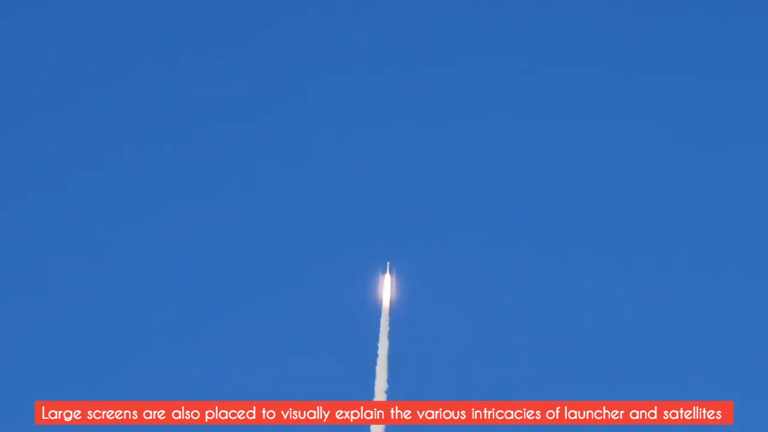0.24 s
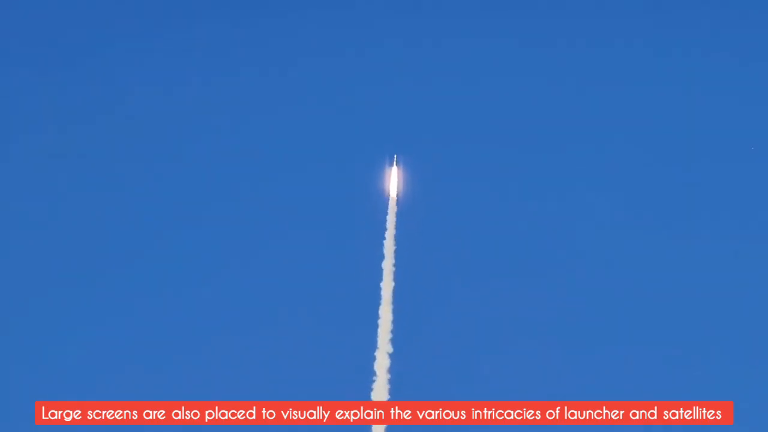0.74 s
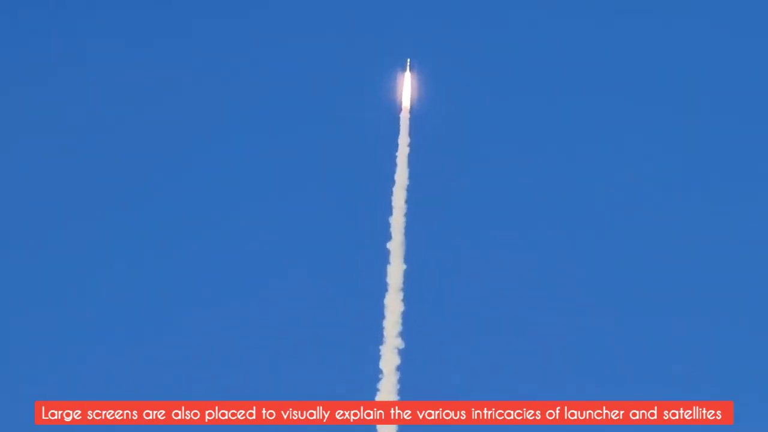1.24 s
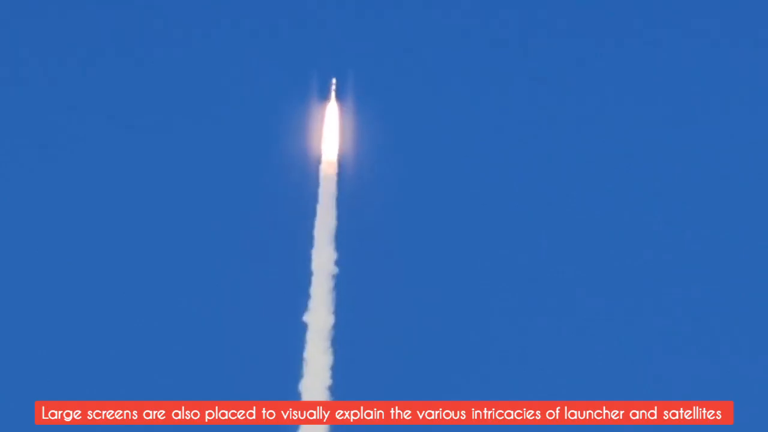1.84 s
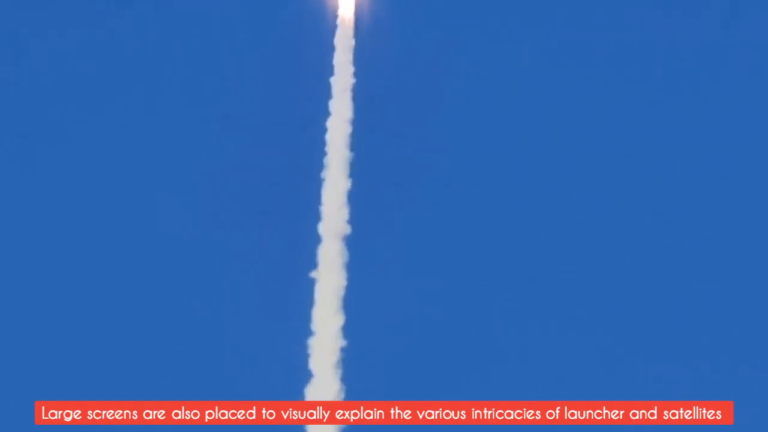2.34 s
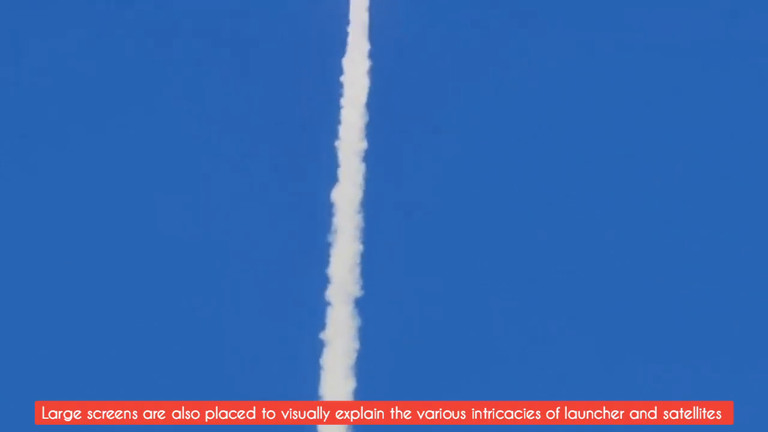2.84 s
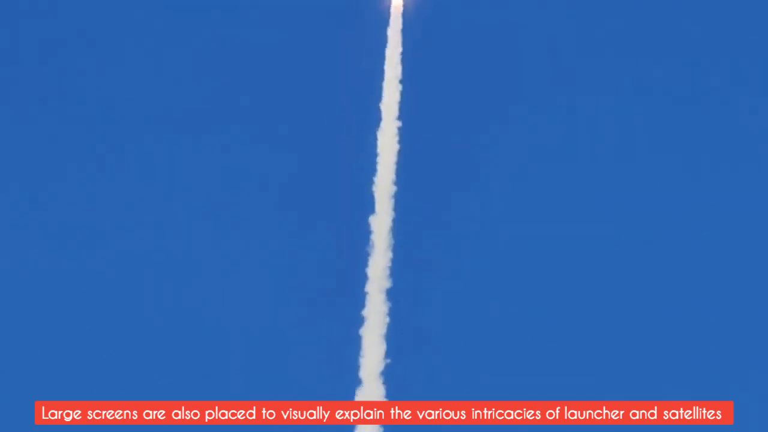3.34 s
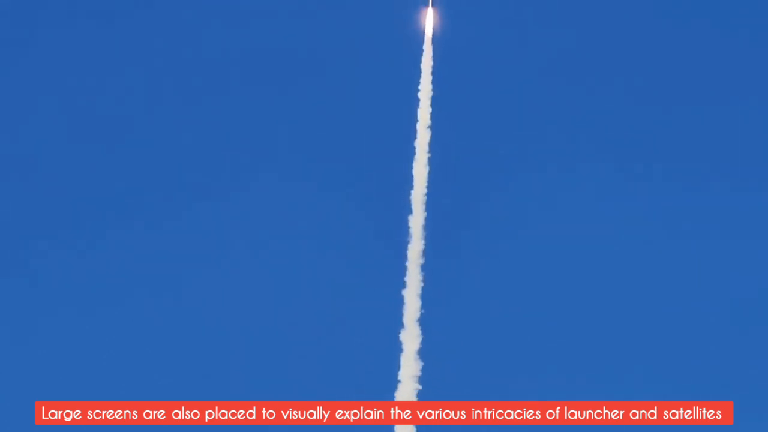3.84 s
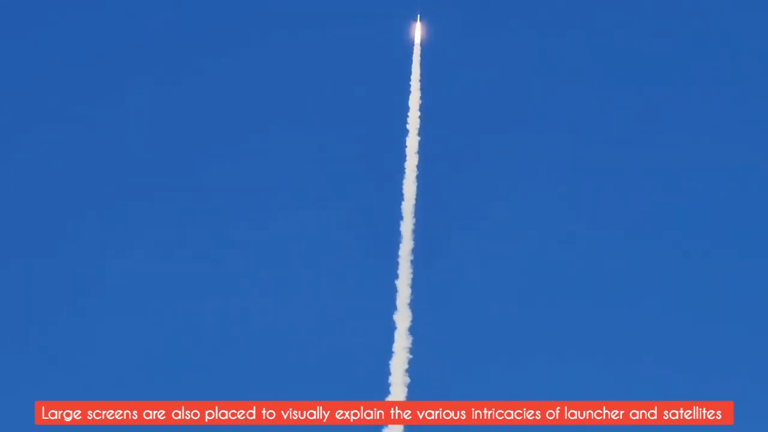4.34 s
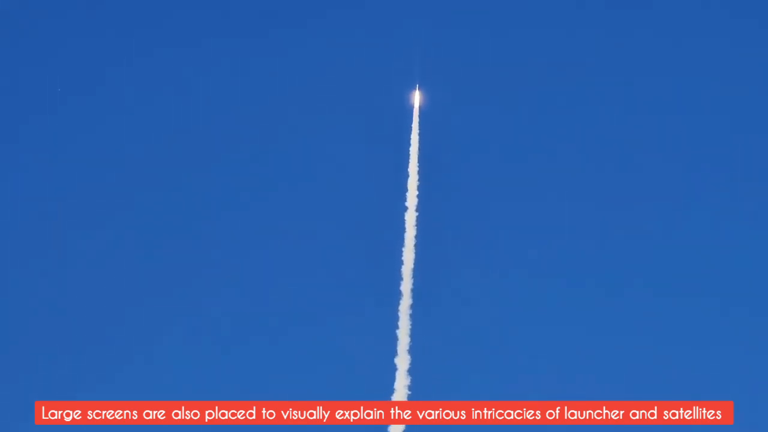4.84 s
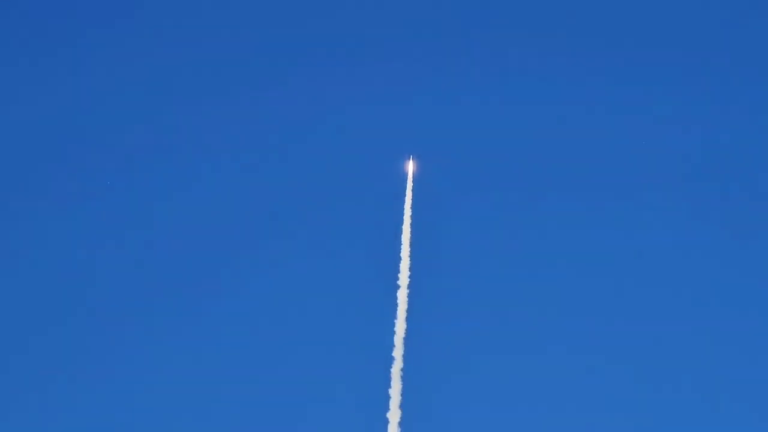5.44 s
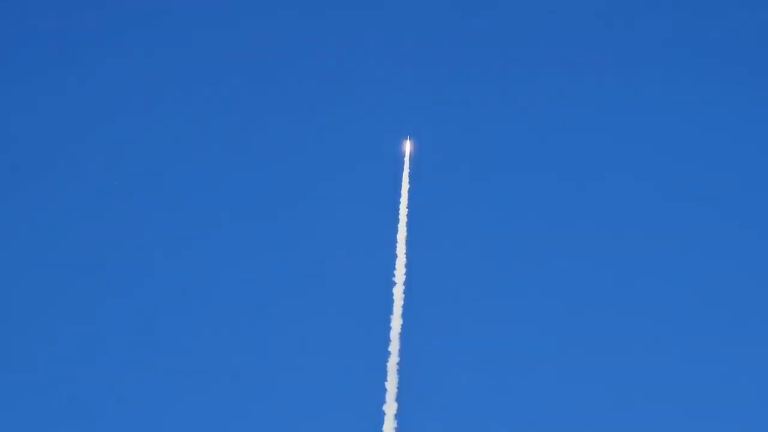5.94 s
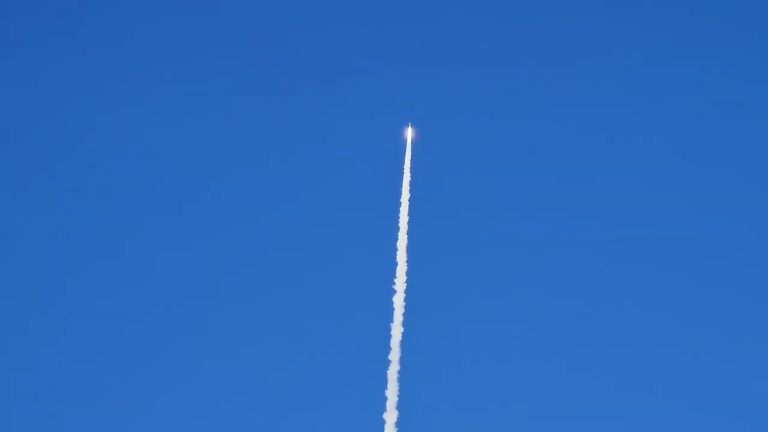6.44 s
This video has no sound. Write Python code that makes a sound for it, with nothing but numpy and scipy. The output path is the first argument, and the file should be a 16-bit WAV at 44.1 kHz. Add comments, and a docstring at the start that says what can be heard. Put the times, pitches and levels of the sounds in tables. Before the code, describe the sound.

A handheld microphone in open air picks up distant rocket exhaust, all bass roll and muffled buffeting, over very faint air noise. Small handling scuffs appear early. Then the sound blinks out for an instant and a rushing, shivering hiss joins, quickly brightening, turning briefly hollow, and tapering away over several seconds. Dull knocks, the heaviest past the middle, punctuate the steady rumble.

```python
"""A far-off rocket rumbles and rolls in the open air, with a few dull thumps and faint camera handling.
After a brief dropout a fluttering hiss cuts in, swells, brightens and slowly fades, with sharp ticks.
The exhaust is three bands of levelled noise; thumps are rounded push-pull pressure fronts.
The hiss is noise in 22 bands, each rising and falling by its own law; clicks are dying noise scuffs."""
import sys
import numpy as np
from scipy import signal
from scipy.fft import rfft, irfft, next_fast_len
from scipy.io import wavfile
from scipy.ndimage import uniform_filter1d, minimum_filter1d

SR = 44100
rng = np.random.default_rng(int(sys.argv[2]) if len(sys.argv) > 2 else 0)


def generate_wav(sig):
    """Save sig (samples, or channels by samples) to the path in sys.argv[1] as 16-bit PCM at SR."""
    pcm = np.round(np.clip(np.atleast_2d(sig).T, -1, 1) * 32767).astype(np.int16)
    wavfile.write(sys.argv[1], SR, pcm)


N = 295029
TIME = np.arange(N) / SR   # [s]
FFT_SIZE = next_fast_len(N, real=True)
BIN_HZ = np.maximum(np.fft.rfftfreq(FFT_SIZE, 1 / SR), 1)
# silent instant: (start [s], end [s])
DROPOUT_SPAN_S = (1.7705, 1.779)


def from_db(db):
    """Decibels to amplitude gain."""
    return 10 ** (np.asarray(db) / 20)


def rms_one(x):
    """Scale to unit rms."""
    return x / np.sqrt(np.mean(x ** 2) + 1e-20)


def in_time(rows):
    """Interpolate each column of a (time, value, ...) table to a control signal."""
    time_s, *columns = np.transpose(rows)
    return [np.interp(TIME, time_s, column) for column in columns]


def spectrum_db(points):
    """Spectrum on the FFT grid, log-frequency interpolation, falling 30 dB/octave further past its ends."""
    hz, db = np.transpose(points)
    octaves_outside = np.abs(np.log2(BIN_HZ / np.clip(BIN_HZ, hz[0], hz[-1])))
    return np.interp(np.log(BIN_HZ), np.log(hz), db) - 30 * octaves_outside


def filtered(x, gain):
    """Weight a signal by a gain per frequency bin."""
    return irfft(rfft(x, FFT_SIZE) * gain, FFT_SIZE)[:N]


def noise(shape_db):
    """Gaussian noise of a given colour, rms 1."""
    white = rng.standard_normal(FFT_SIZE)
    return rms_one(filtered(white, from_db(shape_db)))


def wobble(rate_hz, width_hz):
    """Narrow-band noise around one rate, rms 1: a random sway or an unsteady tone."""
    return noise(-20 * np.log10(1 + ((BIN_HZ - rate_hz) / width_hz) ** 2))


def steadied(x, size):
    """Even out the level over about `size` samples, keeping the quicker lumps."""
    power = uniform_filter1d(uniform_filter1d(x ** 2, size), size)
    return x / np.sqrt(power + 1e-9)


def bell(x, centre, half_width):
    """Gaussian bump of height 1, down to 1/e at half_width."""
    return np.exp(-((x - centre) / half_width) ** 2)


def bumps(rows):
    """Summed gain of smooth swells: (time [s], half length [s], level [dB])."""
    return sum(from_db(db) * bell(TIME, time_s, half_s) for time_s, half_s, db in rows)


def passing_db(closest_s, rise_s, fall_s, power):
    """Level of a source that nears and recedes, relative to its closest point."""
    distance = np.hypot(1, (TIME - closest_s) / np.where(TIME < closest_s, rise_s, fall_s))
    return -20 * power * np.log10(distance)


def resonances_db():
    """Narrow lifts that give the hiss and the open air a faintly whistling colour."""
    # resonances: (centre [Hz], width [Hz], lift [dB])
    peaks = [(836, 48, 6.5), (1200, 190, 4), (1677, 18, 6.5), (2300, 99, 0.5)]
    return sum(lift_db / (1 + (2 * (BIN_HZ - hz) / width_hz) ** 2) for hz, width_hz, lift_db in peaks)


def rumble(deep_db, body_db, gust_db, lumpy_db):
    """Large eddies in the plume make the deep roll; smaller ones come in bursts above it."""
    # exhaust roll, before trims: (time [s], deep eddies [dB], smaller eddies [dB], gusty upper edge [dB])
    roll_levels = [(0.0, -18, -19.5, -39.5), (0.19, -16, -17.0, -43.5), (0.49, -12.0, -24.5, -35),
                   (1.4, -20, -17.0, -38.5), (1.66, -16, -19, -33), (2.0, -18.5, -17.5, -30.5),
                   (2.27, -15, -14.5, -27.5), (2.38, -17, -15, -28), (3.17, -19.5, -15, -30.0),
                   (3.48, -25, -18, -35), (3.86, -23.5, -20.5, -32.5), (4.24, -20, -19.5, -35.5),
                   (4.72, -26.5, -18.5, -35.5), (5.07, -18.5, -18.0, -36.5), (5.71, -24.5, -19.5, -37.5),
                   (5.9, -21, -21, -35), (6.46, -20, -17.5, -30), (6.69, -35, -21, -35.5)]
    # relative spectrum of the deep eddies: (frequency [Hz], level [dB])
    deep_colour = [(18, -48.5), (30, -28.5), (45, -14.5), (60, -3.5), (82, 4), (100, -6.5), (125, -6.5),
                   (170, -44.5)]
    # relative spectrum of the smaller eddies: (frequency [Hz], level [dB])
    body_colour = [(70, -45), (100, -4.5), (125, 5), (165, 2.5), (210, -4), (260, -12.5), (330, -32.5),
                   (480, -50)]
    # relative spectrum of the gusty edge: (frequency [Hz], level [dB])
    gust_colour = [(170, -9.5), (260, 4), (340, -2), (430, -6.5), (550, -13), (720, -27), (1000, -37.5),
                   (2000, -64)]
    # short swells of the smaller eddies, before trim: (time [s], half length [s], level [dB])
    swells = [(1.59, 0.042, -25.5), (2.83, 0.022, -12.5), (3.56, 0.054, -27), (5.36, 0.028, -17)]
    # flurries of buffeting at the top, before trim: (time [s], half length [s], level [dB])
    flurries = [(.06, 0.14, -24.5), (4.72, 0.072, -26.5), (5.0, 0.034, -24.5)]

    deep, body, gust = in_time(roll_levels)
    roll = from_db(deep + deep_db) * steadied(noise(spectrum_db(deep_colour)), size=3600)

    body_gain = from_db(body_db) * (from_db(body) + bumps(swells))
    roar = body_gain * steadied(noise(spectrum_db(body_colour)), size=4000)

    bursts = noise(spectrum_db(gust_colour)) * from_db(lumpy_db * wobble(rate_hz=12, width_hz=17))
    gust_gain = from_db(gust_db) * (from_db(gust) + bumps(flurries))
    return roll + roar + gust_gain * steadied(bursts, size=3000)


def thumps(level_db):
    """Pressure fronts rounded by distance: one push and one pull each."""
    # fronts, before trim and colouring: (time [s], peak [dB], centre [Hz])
    fronts = [(0.013, -15, 241), (.049, -26, 290), (0.129, -17, 306), (0.143, -15.5, 226),
              (.148, -20.5, 289), (.213, -20.5, 217), (1.7036, -23, 284.3), (2.3158, -14, 128.8),
              (3.972, -9, 235), (4.2853, -3, 233), (4.9801, -5.5, 284), (4.983, -9, 140),
              (5.008, -14.5, 135), (5.046, -12.5, 342), (5.169, -12.5, 135), (5.181, -15, 188.7),
              (5.1847, -12.5, 199)]
    # dulled by distance, thinned by the microphone's low cut: (frequency [Hz], gain [dB])
    loss = [(25, -19.5), (90, 16), (550, -3), (800, -8), (1300, -15.5)]

    out = np.zeros(FFT_SIZE)
    for time_s, peak_db, hz in fronts:
        near = np.flatnonzero(np.abs(TIME - time_s) < 2 / hz)
        phase = 2 * np.pi * hz * (TIME[near] - time_s)
        front = -np.tanh(phase) / np.cosh(phase) ** 2
        out[near] += from_db(peak_db + level_db) * front / np.abs(front).max()
    return filtered(out, from_db(spectrum_db(loss)))


def background(level_db, hiss_db):
    """Faint, dull wash of the open air over the microphone's own white hiss."""
    # open air, before trim: (time [s], level [dB])
    air_levels = [(0, -72.5), (.3, -73.5), (.55, -71.5), (.85, -65.5), (1.2, -63.5), (1.72, -62)]
    # relative spectrum of the open air: (frequency [Hz], level [dB])
    air_colour = [(500, -4.5), (1000, 4), (1300, 3), (1680, 1.5), (1950, -13.5), (2700, -20), (3600, -12.5),
                  (5000, -20), (7500, -39.5), (15000, -33)]
    level, = in_time(air_levels)
    wash = from_db(level + level_db) * noise(spectrum_db(air_colour) + resonances_db())
    return wash + from_db(hiss_db) * rng.standard_normal(N)


def whistle(level_db, fade_s, hz, width_hz):
    """Thin, unsteady tone that dies away from the start: narrow-band noise."""
    return from_db(level_db) * bell(TIME, 0, fade_s) * wobble(hz, width_hz)


def clicks(rows, level_db, t60_s, spread):
    """Short dying scuffs of noise, each in a band from centre / spread to centre * spread."""
    out = np.zeros(N)
    age_s = TIME[:SR // 10]
    for time_s, peak_db, hz in rows:
        scuff = rng.standard_normal(len(age_s)) * np.exp(-np.log(1000) * age_s / t60_s)
        band = signal.butter(2, [hz / spread, hz * spread], "band", fs=SR, output="sos")
        scuff = signal.sosfilt(band, scuff)
        start = round(time_s * SR)
        out[start:start + len(age_s)] += from_db(peak_db + level_db) * scuff / np.abs(scuff).max()
    return out


def handling_clicks():
    """Faint clicks of the camera being handled: broad noise scuffs."""
    # clicks, before trim: (time [s], peak [dB], centre [Hz])
    click_rows = [(.347, -53, 1500), (.373, -60, 2000), (.380, -50, 1550), (.397, -53.5, 1600),
                  (.754, -63, 2800), (.785, -58, 2800), (.825, -53, 1614), (.845, -49, 1680),
                  (1.054, -58, 2500), (1.538, -53, 2120), (1.56, -53, 1720), (1.58, -51, 1525)]
    return clicks(click_rows, level_db=1.5, t60_s=0.041, spread=1.5)


def rustle(hz, width_hz, grain_db):
    """Fingers shifting on the camera: a faint scrape, noise with a fast random grain."""
    # shifts around the handling clicks: (time [s], half length [s], level [dB])
    shifts = [(.835, .045, -72), (.95, .07, -73), (1.56, .035, -67)]
    grain = from_db(grain_db * wobble(rate_hz=50, width_hz=80))
    return bumps(shifts) * rms_one(wobble(hz, width_hz) * grain)


def rush(level_db, patchy_db):
    """Hiss like something rushing past: swells fast, brightest at its peak, dulls as it slowly fades."""
    # relative spectrum: (frequency [Hz], level [dB])
    hiss_colour = [(300, -29.5), (480, 0.5), (680, 3.5), (1000, -3.5), (1150, -5.5), (1500, -7),
                   (1900, -7.5), (2300, -9), (3200, -14.5), (3900, -6.5), (4800, -5), (5400, -11.5),
                   (6800, -14.5), (9500, -23), (15000, -42)]
    # rise and fall by band, before trim:
    # (frequency [Hz], peak [dB], rise [s], fall [s], power of distance by which it weakens [-])
    pass_laws = [(830, -30, 0.048, 0.066, 0.48), (1620, -26.5, 0.078, 0.15, 0.78),
                 (2980, -26, 0.11, 0.22, 0.9), (4350, -35.5, 0.08, 0.45, 0.79),
                 (8000, -29, 0.11, 0.52, 1.795), (12900, -21, 0.13, 0.53, 2.7)]
    # surges and lulls: (time [s], half length [s], change [dB], centre [Hz], half width [octaves])
    surge_rows = [(1.864, 0.037, 5.5, 4460, 0.54), (2.442, 0.1, 8.5, 840, 0.52),
                  (2.65, 0.095, 4, 695, 0.77), (2.92, .07, 2.5, 3000, 4.5), (3.55, 0.059, 1, 1420, 0.25),
                  (3.906, .09, 7, 800, 0.31), (4.763, 0.085, -4, 4000, 1.1), (5.15, 0.11, 3, 2300, 0.68),
                  (6.356, 0.18, -5, 3800, 2), (6.548, .12, -6, 9000, .6)]

    white = rng.standard_normal(FFT_SIZE)
    colour = rms_one(from_db(spectrum_db(hiss_colour) + resonances_db()))
    centres_hz = np.geomspace(500, 14000, 22)
    law_hz, *laws = np.transpose(pass_laws)
    surges = [(db * bell(TIME, time_s, half_s), np.log2(hz), octaves)
              for time_s, half_s, db, hz, octaves in surge_rows]

    out = np.zeros(N)
    for share, hz in zip(np.eye(len(centres_hz)), centres_hz):
        # triangular bands on a log axis; together they pass the whole colour
        band_gain = np.interp(np.log(BIN_HZ), np.log(centres_hz), share)
        band = filtered(white, colour * band_gain)
        peak_db, rise_s, fall_s, power = [np.interp(np.log(hz), np.log(law_hz), law) for law in laws]
        level = peak_db + passing_db(2.765, rise_s, fall_s, power)
        level = level + sum(surge * bell(np.log2(hz), centre, octaves)
                            for surge, centre, octaves in surges)
        # turbulent air lets every band come and go by itself
        out += band * from_db(level + patchy_db * wobble(rate_hz=0, width_hz=14))
    return from_db(level_db) * out


def howl(level_db, hz, width_hz, peak_s, rise_s, fall_s, power):
    """Hollow, breathy band of noise that trails the swell."""
    level = level_db + passing_db(peak_s, rise_s, fall_s, power)
    return from_db(level) * wobble(hz, width_hz)


def flutter(beat_db, shiver_db):
    """Gain that opens after the dropout and flutters about 23 times a second, with a finer shiver."""
    beat = beat_db * wobble(rate_hz=22.9, width_hz=0.86)
    shiver = shiver_db * wobble(rate_hz=57, width_hz=110)
    return from_db(beat + shiver) * (TIME > DROPOUT_SPAN_S[1])


def hiss_ticks():
    """Sharp ticks inside the hiss: very short noise scuffs in narrower bands."""
    # ticks, before trim: (time [s], peak [dB], centre [Hz])
    tick_rows = [(2.918, -27, 4420), (3.395, -26.5, 4170), (3.611, -30.5, 3720), (4.844, -42, 3980),
                 (5.563, -38, 4200)]
    return clicks(tick_rows, level_db=1.5, t60_s=0.02, spread=1.24)


def limited(x, size):
    """Limiter: turns the gain down smoothly, over `size` samples, around peaks near full scale."""
    ceiling = .94
    gain = ceiling / np.maximum(np.abs(x), ceiling)
    held = minimum_filter1d(gain, 2 * size + 1)
    return x * uniform_filter1d(uniform_filter1d(held, size), size)


def scene():
    """Rumble, thumps and hiss from far away, small clicks close by, over faint open air."""
    rocket = rumble(deep_db=-4.0, body_db=-3.5, gust_db=-2.5, lumpy_db=2.5) + thumps(level_db=-1.0)
    air = background(level_db=-0.5, hiss_db=-83.0)
    air = air + whistle(level_db=-75, fade_s=0.23, hz=3900, width_hz=120)
    hands = handling_clicks() + rustle(hz=2200, width_hz=2100, grain_db=4.5)
    hiss = rush(level_db=0.14, patchy_db=1.7)
    hiss = hiss + howl(level_db=-37.5, hz=1375, width_hz=96, peak_s=2.94,
                       rise_s=0.29, fall_s=0.28, power=1.72)
    hiss = hiss * flutter(beat_db=0.76, shiver_db=1.81)
    return (rocket + air + hands + hiss + hiss_ticks())[None]


def record(dry):
    """Peaks are limited, the sound drops out for an instant, and the top is cut at 15.4 kHz."""
    live = (TIME < DROPOUT_SPAN_S[0]) | (TIME > DROPOUT_SPAN_S[1])
    # order 10, 0.1 dB ripple, 80 dB stop band
    low_pass = signal.ellip(10, .1, 80, 15400, fs=SR, output="sos")
    return signal.sosfilt(low_pass, limited(dry, size=200) * live)


dry = scene()
out = record(dry)
generate_wav(out)
```